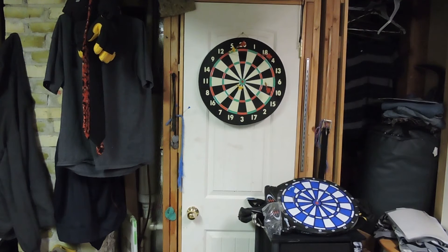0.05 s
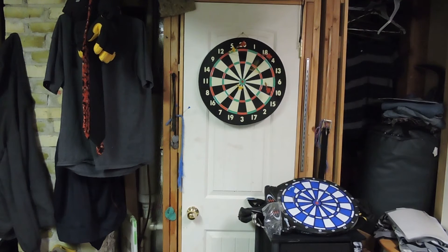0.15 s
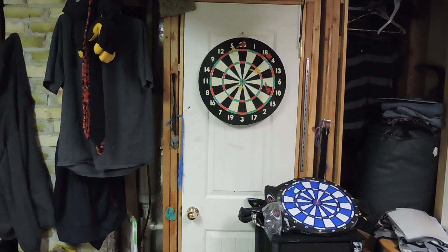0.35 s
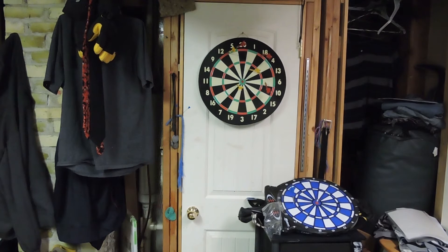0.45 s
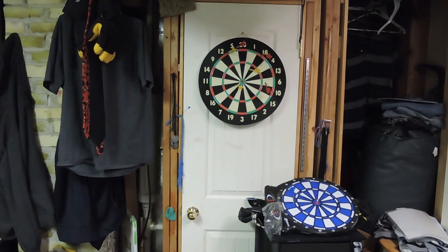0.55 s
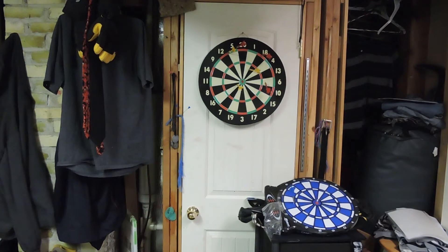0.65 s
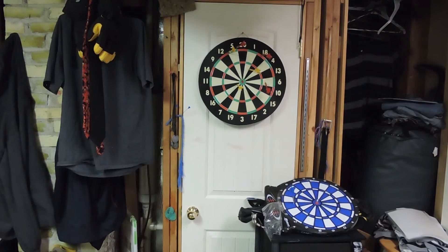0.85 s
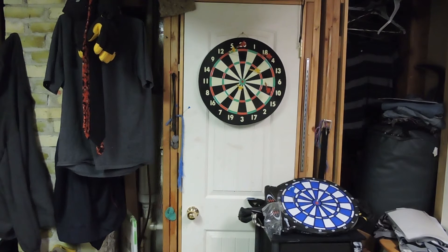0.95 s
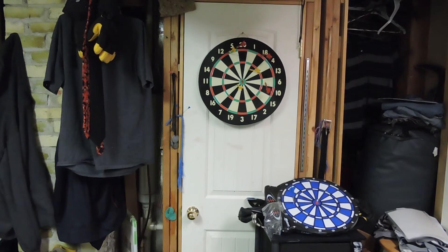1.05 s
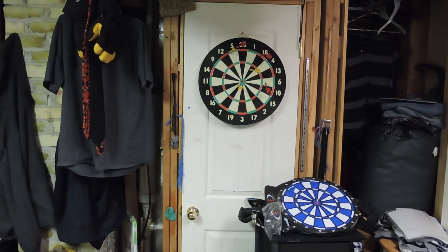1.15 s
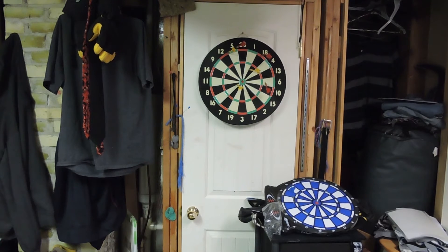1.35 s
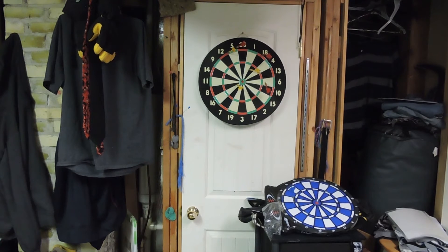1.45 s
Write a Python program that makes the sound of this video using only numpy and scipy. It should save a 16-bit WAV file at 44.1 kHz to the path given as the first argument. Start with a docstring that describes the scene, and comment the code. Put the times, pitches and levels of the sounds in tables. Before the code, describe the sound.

One sharp, woody knock of a dart hitting a dartboard indoors, over faint hum.

```python
"""A small cluttered room: quiet noise and mains hum throughout, a deep rumble and a faint rustle first.
At 0.24 s a dart thuds into a bristle board hung on a hollow wooden door. The point ticks into the
fibres; board and door ring briefly. The room answers with a short tail and a low boom, while dart
and board wires ring on faintly. More soft rumbles and rustles come and go to the end."""
import sys
import numpy as np
from scipy import signal
from scipy.io import wavfile

SR = 44100
rng = np.random.default_rng(int(sys.argv[2]) if len(sys.argv) > 2 else 0)


def materialize(psi):
    """Save the field psi as 16-bit PCM at rate SR to the path in sys.argv[1].

    A 1-D psi becomes a single channel; in a 2-D psi each row is a channel.
    """
    bounded = np.clip(np.atleast_2d(psi).T, -1, 1)
    quanta = np.round(bounded * 32767).astype(np.int16)
    wavfile.write(sys.argv[1], SR, quanta)


N = 66150
T = np.arange(N) / SR

HIT_S = .2402
AIR_DB, HUM_WAVER = -47, 0.1
TAIL_DB, TAIL_ATTACK_S = -20, 0.003
TICK_DB, TICK_T60_S, TICK_ATTACK_S = -20, 0.05, 0.00026
BOOM_ATTACK_S, WIRES_ATTACK_S, BOARD_ATTACK_S = 0.00053, 0.006, 0.00031
STOPBAND_HZ = 16300

# room noise (frequency [Hz], relative density [dB])
AIR_SPECTRUM = [(20, -1.5), (35, -8.5), (65, -3), (90, -12), (130, -12), (260, -13.5), (450, -18),
                (700, -20), (1380, -25.5), (1900, -23), (2300, -25.5), (7300, -32.5), (11000, -35.5),
                (15500, -40)]
# room noise and swells (frequency [Hz], left-right coherence [0-1])
AIR_COHERENCE = [(40, 0.62), (200, 0.59), (1000, 0.58), (4000, 0.39), (14000, 0.32)]
# room noise and swells (frequency [Hz], left minus right [dB])
AIR_PAN = [(50, -3), (200, -0.8), (500, 2.5), (950, 6), (2000, 0), (10000, -0.9)]
# mains hum (frequency [Hz], rms level [dB])
HUM_PARTIALS = [(60, -56), (119.5, -58)]
# rumble swells (time [s], half width [s], level [dB])
RUMBLE_SWELLS = [(.02, 0.046, -39), (.34, 0.073, -42), (1.39, 0.05, -51)]
# rumble (frequency [Hz], relative density [dB])
RUMBLE_SPECTRUM = [(22, 9), (42, -15), (70, -24), (150, -22), (600, -75)]
# rustle swells (time [s], half width [s], level [dB])
RUSTLE_SWELLS = [(0.105, .035, -52.5), (.58, 0.029, -53), (.9, 0.014, -57), (1.26, 0.022, -57),
                 (1.345, .012, -54), (1.408, .027, -47.5)]
# rustle (frequency [Hz], relative density [dB])
RUSTLE_SPECTRUM = [(100, -7), (400, -5.5), (900, -3), (1250, -8.5), (1650, 5.5), (2200, -7), (3000, -3.5),
                   (5000, -12.5), (10000, -14), (15000, -29)]
# reverberation (frequency [Hz], relative density [dB])
TAIL_SPECTRUM = [(25, -37), (70, -4), (110, 3), (200, -11), (330, -3.5), (560, 0.5), (750, -14.5),
                 (1050, -3.5), (2000, -10.5), (3500, -16.5), (6000, -26.5), (10500, -28.5), (15000, -46)]
# reverberation decay (frequency [Hz], T60 [s])
TAIL_T60 = [(100, 0.4), (300, 0.28), (600, 0.3), (1000, 0.2), (2500, .28), (5000, 0.26), (12000, 0.17)]
# tail and tick (frequency [Hz], left-right coherence [0-1])
ROOM_COHERENCE = [(40, 1), (200, 0.94), (500, .85), (1000, .55), (2000, 0), (5000, 0.43), (14000, 0.37)]
# tail, tick and wires (frequency [Hz], left minus right [dB])
ROOM_PAN = [(200, 1), (450, 3.5), (950, 10.5), (1600, 0), (4000, -0.7), (10000, -4)]
# low resonances of door and room (frequency [Hz], level [dB], T60 [s])
BOOM_MODES = [(63.9, -22, 0.31), (122, -25, 0.45), (140.2, -33.5, 0.61), (157, -23, 0.37),
              (209.6, -23, 0.27), (261, -32.5, 0.38), (295, -31, 0.38), (363.6, -27, 0.29),
              (459.7, -13.5, 0.13), (563, -28, 0.38)]
# dart and board wires (frequency [Hz], level [dB], T60 [s])
WIRE_MODES = [(1336, -42, 0.49), (2065, -45.5, 0.31), (2090, -36.5, 0.31), (2500, -47, 0.38),
              (3424, -42, 0.37), (3685, -58, 0.64), (4380, -47.5, 0.33), (5670, -44.5, 0.32),
              (5900, -44, 0.21)]
# point entering the fibres (frequency [Hz], relative density [dB])
TICK_SPECTRUM = [(200, -16), (750, -22), (1100, 10), (1500, -5.5), (3000, 0), (4400, -5.5), (5400, -47),
                 (8500, -25.5), (11000, -17), (13000, -21), (15000, -38)]
# board on its door (frequency [Hz], level [dB], T60 [s])
BOARD_MODES = [(184, -12.5, 0.14), (248, -18, 0.25), (432, -12, 0.08), (515, -32, 0.028),
               (523.5, -6.5, 0.087), (637.4, -13, 0.061), (871, -10.5, 0.057), (1196, -22.5, 0.048),
               (1280, -22.5, 0.077), (1600, -21.5, 0.081), (1722, -21, 0.06), (1862, -22, 0.078),
               (2150, -26.5, 0.1), (2330, -33, 0.071), (3060, -48, .04)]
# board (frequency [Hz], left minus right [dB])
BOARD_PAN = [(200, -.7), (420, -.3), (530, 1.5), (660, 3.5), (880, 5), (1250, 5), (1600, .5), (3200, -1.5)]
# arrival of all modes (frequency [Hz], left lead [s])
MODE_LEAD = [(200, .00008), (520, .00012), (850, 0), (1700, -.00003)]


def from_db(db):
    """Decibels to gain."""
    return 10 ** (np.asarray(db) / 20)


def at_hz(table, hz):
    """Interpolate a table over log frequency."""
    table_hz, values = np.transpose(table)
    return np.interp(np.log(hz), np.log(table_hz), values)


def pan(table, hz):
    """Left and right gains from a pan table."""
    return from_db(np.array([[.5], [-.5]]) * at_hz(table, hz))


def drift(rate_hz):
    """Slow random curve through Gaussian knots."""
    knots = rng.standard_normal(int(rate_hz * N / SR) + 2)
    return np.interp(T * rate_hz, np.arange(len(knots)), knots)


def struck(attack_s, t60_s):
    """Envelope: rise at the hit, exponential decay."""
    age_s = np.maximum(T - HIT_S, 0)
    return (1 - np.exp(-age_s / attack_s)) * from_db(-60 * age_s / t60_s)


def noise_bands(spectrum, coherence, pan_table):
    """Third-octave stereo noise, summing to unit rms: (centres [Hz], bands)."""
    edges_hz = np.geomspace(18, 17000, 31)
    centres_hz = np.sqrt(edges_hz[1:] * edges_hz[:-1])
    white = rng.standard_normal((2, 2, N + SR // 4))
    bands = []
    for k, hz in enumerate(centres_hz):
        bandpass = signal.butter(2, edges_hz[k:k + 2], "band", fs=SR, output="sos")
        mid, side = signal.sosfilt(bandpass, white[k % 2])[:, -N:]
        alike = at_hz(coherence, hz)
        stereo = np.sqrt(1 + alike) * mid + np.sqrt(1 - alike) * side * [[1], [-1]]
        bands.append(from_db(at_hz(spectrum, hz)) * pan(pan_table, hz) * stereo)
    return centres_hz, np.array(bands) / np.std(sum(bands))


def ring(modes, attack_s, pan_table=None):
    """Damped stereo sines set off by the hit, alternating in sign."""
    total = np.zeros((2, N))
    for k, (hz, db, t60_s) in enumerate(modes):
        age_s = T - HIT_S + np.array([[.5], [-.5]]) * at_hz(MODE_LEAD, hz)
        wave = (-1) ** k * from_db(db) * struck(attack_s, t60_s) * np.sin(2 * np.pi * hz * age_s)
        total += wave if pan_table is None else wave * pan(pan_table, hz)
    return total


def background():
    """Steady room noise and wavering mains hum."""
    _, bands = noise_bands(AIR_SPECTRUM, AIR_COHERENCE, AIR_PAN)
    hum = np.zeros(N)
    for hz, rms_db in HUM_PARTIALS:
        amplitude = from_db(rms_db) * np.sqrt(2) * (1 + HUM_WAVER * drift(rate_hz=10.5))
        hum += amplitude * np.sin(2 * np.pi * (hz * T + rng.random()))
    return from_db(AIR_DB) * sum(bands) + hum


def swells(events, spectrum):
    """Soft swells of coloured noise: rumble or rustle."""
    _, bands = noise_bands(spectrum, AIR_COHERENCE, AIR_PAN)
    envelope = sum(from_db(db) / (1 + ((T - time_s) / half_s) ** 2) for time_s, half_s, db in events)
    return envelope * sum(bands)


def room_answer():
    """Diffuse reflections decaying per band, over low door and room resonances."""
    centres_hz, bands = noise_bands(TAIL_SPECTRUM, ROOM_COHERENCE, ROOM_PAN)
    tail = sum(band * struck(TAIL_ATTACK_S, at_hz(TAIL_T60, hz)) for hz, band in zip(centres_hz, bands))
    return from_db(TAIL_DB) * tail + ring(BOOM_MODES, BOOM_ATTACK_S)


def wire_ring():
    """Thin metal partials of dart and wires, outlasting the knock."""
    return ring(WIRE_MODES, WIRES_ATTACK_S, ROOM_PAN)


def point_tick():
    """Short bright crunch of the point entering the fibres."""
    _, bands = noise_bands(TICK_SPECTRUM, ROOM_COHERENCE, ROOM_PAN)
    return from_db(TICK_DB) * struck(TICK_ATTACK_S, TICK_T60_S) * sum(bands)


def board_knock():
    """Board and door flex under the hit and ring in fast-damped, woody modes."""
    return ring(BOARD_MODES, BOARD_ATTACK_S, BOARD_PAN)


def scene():
    """The hit and its room over the quiet background."""
    hit = board_knock() + point_tick() + wire_ring() + room_answer()
    steady = background()
    rustles = swells(RUSTLE_SWELLS, RUSTLE_SPECTRUM)
    rumbles = swells(RUMBLE_SWELLS, RUMBLE_SPECTRUM)
    return hit + steady + rustles + rumbles


def record(dry):
    """Clip at full scale, then low-pass steeply."""
    lowpass = signal.cheby2(18, 60, STOPBAND_HZ, fs=SR, output="sos")
    return signal.sosfilt(lowpass, np.clip(dry, -1, 1))


dry = scene()
out = record(dry)
materialize(out)
```